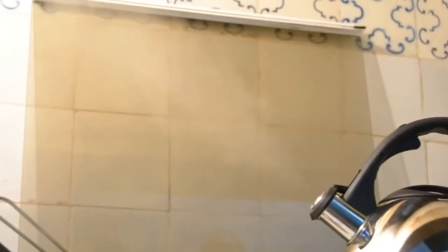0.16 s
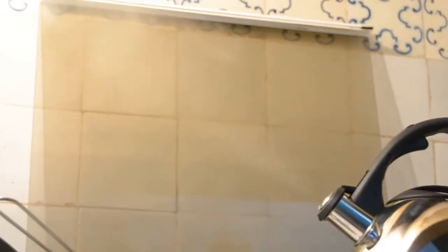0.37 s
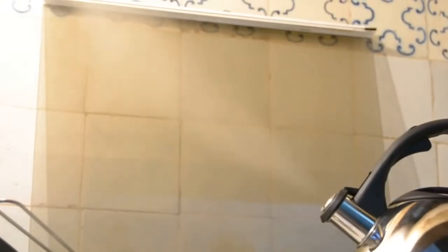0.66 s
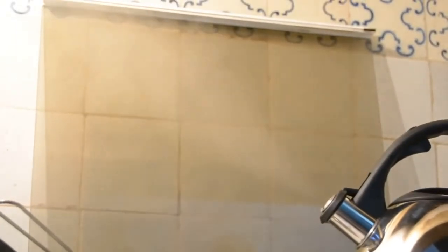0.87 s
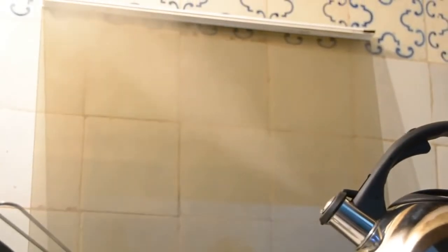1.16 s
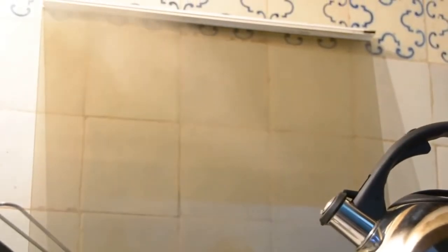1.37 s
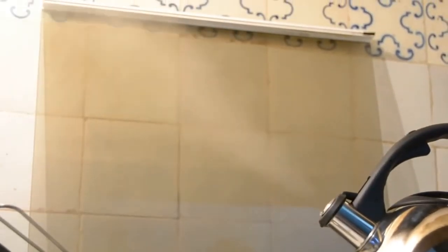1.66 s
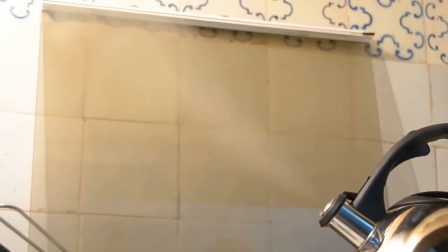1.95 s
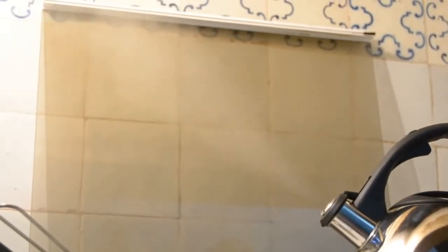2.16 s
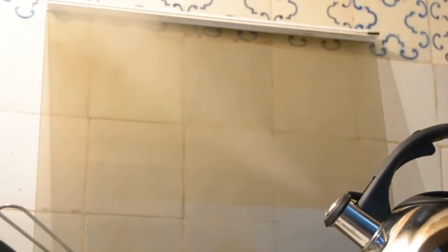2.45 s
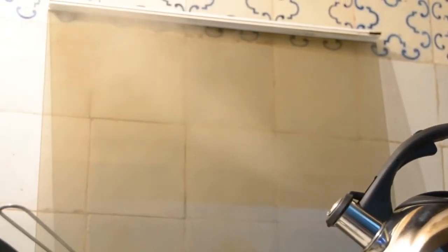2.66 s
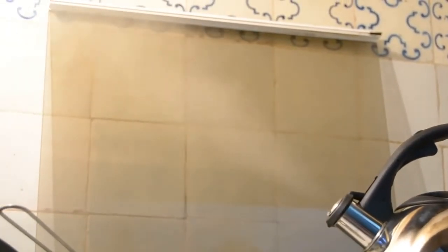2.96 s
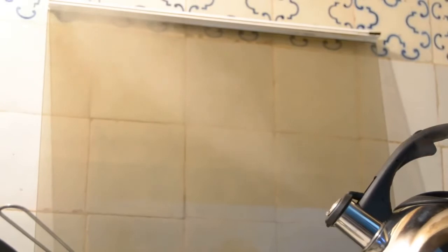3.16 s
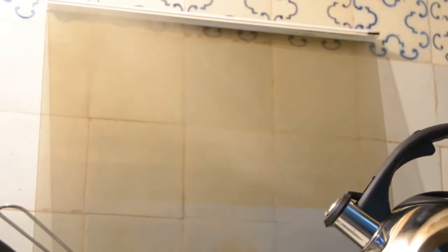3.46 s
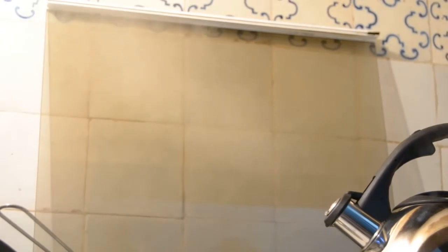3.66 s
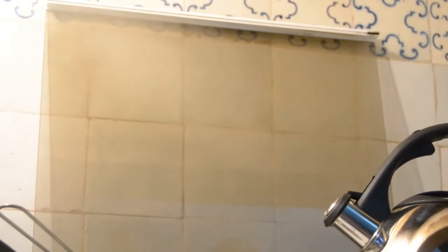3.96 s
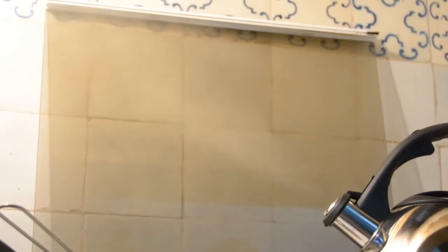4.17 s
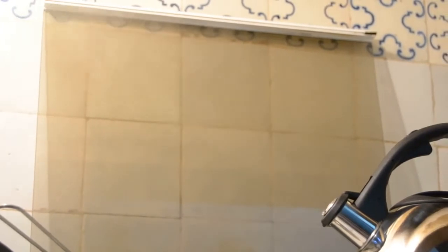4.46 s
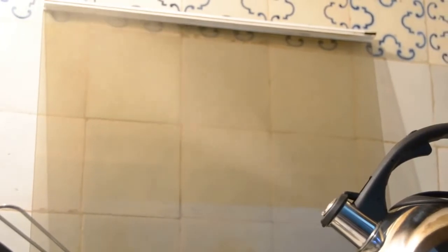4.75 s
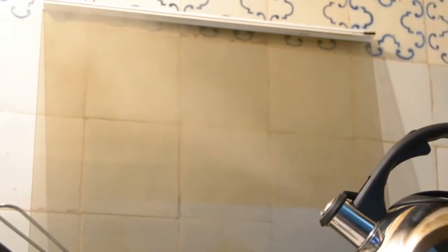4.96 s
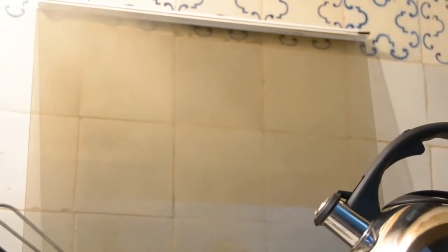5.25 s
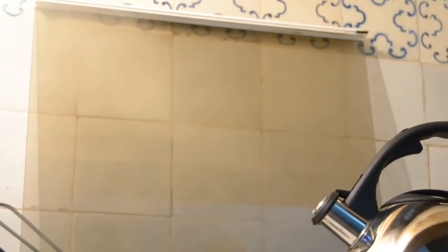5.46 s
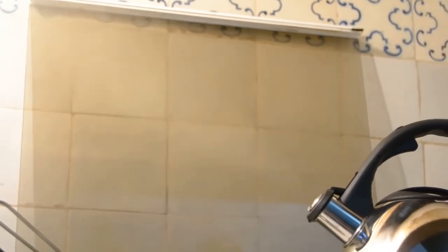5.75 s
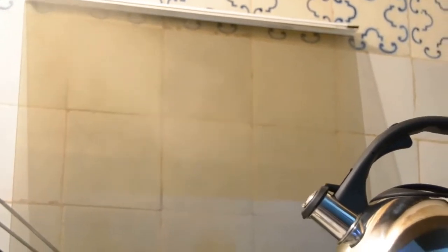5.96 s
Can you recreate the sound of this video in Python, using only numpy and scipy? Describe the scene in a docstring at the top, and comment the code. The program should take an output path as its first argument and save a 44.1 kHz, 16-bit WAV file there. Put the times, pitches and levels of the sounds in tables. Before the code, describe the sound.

For about six seconds a kettle whistles without a break, already boiling at the start and still going at the end. The whistle is very high, thin and breathy, a narrow band of turbulent noise rather than a clean tone, fluttering rapidly and wandering around 5.3 to 5.5 kilohertz. After about 3.5 seconds it sits higher, around 5.5 to 5.6, and becomes somewhat louder, with swells near 4.3 and 5.85. Steam hisses steadily around it, quieter, with bright fine sizzle slowly increasing. Tiny rough wet pips near 3.2 kilohertz, each a few hundredths of a second, spit at about 0.35 (slightly higher and strongest), 1.3, 2.2, 2.9, 4.2, 4.4 and 5.2 seconds. A very soft, even gas-flame rush lies underneath. The microphone is close, in a tiled kitchen whose surfaces give subtle resonant colour; the highest treble is cut off.

```python
"""Whistling kettle in a tiled kitchen.

Steam through the spout whistle: a breathy tone, made by turbulence ringing a narrow, wandering resonance.
The jet hisses as noise shaped by the spout's broad resonances; droplets sputter in the hole as rough pips.
A gas flame rushes underneath as soft noise, and the tiles colour it all with fine fixed peaks and dips."""
import sys
import numpy as np
from scipy import signal
from scipy.fft import rfft, irfft, next_fast_len
from scipy.io import wavfile
from scipy.ndimage import uniform_filter1d, map_coordinates

SR = 44100
rng = np.random.default_rng(int(sys.argv[2]) if len(sys.argv) > 2 else 0)


def to_wav(s):
    """Save 16-bit WAV."""
    ch = np.atleast_2d(s).T  # columns
    pcm = np.round(np.clip(ch, -1, 1) * 32767)  # PCM
    wavfile.write(sys.argv[1], SR, pcm.astype(np.int16))


def rack_gain(trim_db):
    """Turn a fader trim in dB into the linear factor to multiply a signal by."""
    fader = np.asarray(trim_db, float)
    return 10 ** (fader / 20)


N = 269451


def unit(x):
    """Scales x to rms 1."""
    return x / np.sqrt(np.mean(np.abs(x) ** 2) + 1e-20)


def along(points, hz):
    """Reads (frequency [Hz], value) points on a log frequency axis."""
    point_hz, value = np.transpose(points)
    return np.interp(np.log(hz + 1), np.log(point_hz + 1), value)


def curves(rows, t_s):
    """Reads each column after the time at times t_s."""
    row_s, *columns = np.transpose(rows)
    return [np.interp(t_s, row_s, column) for column in columns]


def wobble(knots_per_s):
    """Smooth random curve: a spline through normal random knots."""
    knots = rng.standard_normal(int(N * knots_per_s / SR) + 4)
    return map_coordinates(knots, [np.arange(N) * knots_per_s / SR])


def filtered(x, response):
    """Multiplies the spectrum of x by response(hz), real or complex."""
    size = 2 * next_fast_len(N // 2 + SR // 4)
    spectrum = rfft(x, size) * response(np.fft.rfftfreq(size, 1 / SR))
    return irfft(spectrum, size)[..., :N]


def rush(spectrum, patchy_db):
    """Turbulent noise of rms 1: shaped in frequency, with time-frequency patches of random gain."""
    cells = signal.stft(rng.standard_normal(N), nperseg=512)[2]
    patches = uniform_filter1d(rng.standard_normal(cells.shape), size=6, axis=0)
    patches = unit(uniform_filter1d(patches, size=8, axis=1))
    noise = signal.istft(cells * rack_gain(patchy_db * patches), nperseg=512)[1][:N]
    return unit(filtered(noise, lambda hz: rack_gain(along(spectrum, hz))))


# Whistle tone before flutter and spout cut-off: (time [s], pitch [Hz], rms level [dB])
WHISTLE_TRACK = [(0, 5420, -36), (.2, 5400, -35.5), (.35, 5500, -35.5), (.45, 5300, -36.5),
                 (.76, 5370, -35.5), (.92, 5480, -35), (1.04, 5410, -36), (1.13, 5275, -34),
                 (1.5, 5340, -37), (1.9, 5350, -34.5), (2.33, 5380, -36), (2.43, 5500, -36),
                 (2.7, 5530, -34.5), (3.3, 5460, -37), (3.5, 5490, -36), (3.62, 5650, -33.5),
                 (3.87, 5510, -34), (4.1, 5520, -35), (4.27, 5600, -31), (4.62, 5540, -33.5),
                 (4.87, 5587, -32), (5.2, 5454, -33), (5.76, 5616, -32.5), (5.85, 5500, -30),
                 (6.11, 5604, -32)]


def whistle():
    """Turbulence rings a narrow, trembling resonance in a wider halo; the spout passes little below cut-off."""
    start_width_hz, narrows_hz_per_s, cutoff_hz = 151, 10.8, 5060  # tone tightens as the boil builds
    hz, t_s, cells = signal.stft(rng.standard_normal(N), SR, nperseg=512, noverlap=384)
    pitch_hz, level_db = curves(WHISTLE_TRACK, t_s)
    width_hz = start_width_hz - narrows_hz_per_s * t_s
    frame_at = np.minimum((t_s * SR).astype(int), N - 1)
    offset = (hz[:, None] - pitch_hz) / width_hz  # in widths
    focus = (width_hz / 155) ** 0.9  # core sharpens faster than its halo narrows
    tremble = 0.32 * wobble(50)[frame_at]
    core = np.exp(-((offset - tremble) / focus) ** 2) / np.sqrt(focus)
    halo = rack_gain(-6) * (1 + ((offset + 0.17) / 3.32) ** 2) ** -1.1
    cells = cells * (core + halo) / np.sqrt(width_hz)
    tone = unit(signal.istft(cells, SR, nperseg=512, noverlap=384)[1][:N])
    flutter_db = 0.32 * wobble(45)
    tone = tone * rack_gain(np.interp(np.arange(N) / SR, t_s, level_db) + flutter_db)
    return filtered(tone, lambda hz: 1 / (1 + (cutoff_hz / (hz + 1)) ** 45))


# Jet colour through the spout: (frequency [Hz], relative density [dB per Hz])
SPOUT_COLOUR = [(1500, -33.5), (2100, -26), (2500, -5.5), (2850, 1), (3200, -1), (3500, -7), (3750, -15.5),
                (4200, -21), (4900, -11.5), (5300, -9.5), (6200, 0), (6500, -2.5), (6900, -49)]
# Sizzle above the whistle: (frequency [Hz], relative density [dB per Hz])
SIZZLE_COLOUR = [(6200, -35), (6700, -0.5), (7100, 1.5), (7800, -7), (8500, 1), (9300, -2), (9800, -8),
                 (11000, -12.5)]


def steam():
    """The jet hisses in the spout; boiling makes hiss and sizzle surge together."""
    hiss_db, sizzle_start_db, sizzle_grows_db_per_s = -44, -49.5, 0.29
    surge = wobble(11)
    hiss_gain = rack_gain(hiss_db + 0.36 * surge + 1.36 * wobble(45))
    hiss = hiss_gain * rush(SPOUT_COLOUR, patchy_db=0.62)
    sizzle_db = sizzle_start_db + sizzle_grows_db_per_s * np.arange(N) / SR
    sizzle_gain = rack_gain(sizzle_db + 0.61 * surge + 0.32 * wobble(25))
    return hiss + sizzle_gain * rush(SIZZLE_COLOUR, patchy_db=1.25)


# Droplets thrown through the hole:
# (time [s], level before envelope and lift [dB], pitch [Hz], decay constant [s])
DROPLETS = [(0.3435, -30, 3506, 0.0076), (1.318, -35, 3180, 0.0069), (2.2069, -33.5, 3130, 0.0066),
            (2.9164, -36.5, 3170, 0.01), (4.239, -39.5, 3173, 0.013), (4.433, -31.5, 3200, 0.01),
            (5.1951, -36, 3180, 0.011)]


def drops():
    """A droplet narrows the hole: a short rough pip with its octave, in a puff of sizzle."""
    attack_s, lift_db, lead_samples = 0.0035, 3.5, 150  # each pip begins lead_samples before its listed time
    out, t_s = np.zeros(N + SR), np.arange(SR // 10) / SR
    sizzle = rush(SIZZLE_COLOUR, patchy_db=0)
    for time_s, level_db, pitch_hz, decay_s in DROPLETS:
        start = round(time_s * SR)
        envelope = (1 - np.exp(-t_s / attack_s)) * np.exp(-t_s / decay_s)
        roughness_rad = 0.11 * np.cumsum(rng.standard_normal(len(t_s)))
        phase = 2 * np.pi * pitch_hz * t_s + roughness_rad
        puff = rack_gain(-8.5) * sizzle[start:][:len(t_s)]
        pip = np.sin(phase) + rack_gain(-9) * np.sin(2 * phase) + puff
        out[start - lead_samples:][:len(t_s)] += rack_gain(level_db + lift_db) * envelope * pip
    return out[:N]


# Gas flame colour: (frequency [Hz], relative density [dB per Hz])
FLAME_COLOUR = [(15, -55), (30, -37), (48, -20), (70, -24), (100, -11), (200, -7), (400, -1.5), (600, -1),
                (1120, -0.5), (2100, -3.5), (3800, -6), (4700, -4), (6000, -41)]


def flame():
    """Burning gas: a soft, nearly steady rush of noise."""
    level_db = -55
    return rack_gain(level_db + 0.2 * wobble(3)) * rush(FLAME_COLOUR, patchy_db=0.4)


# Peaks and dips between kettle and microphone: (centre [Hz], full width [Hz], height [dB])
ROOM_PEAKS = [(110, 35, 3), (156, 16, -6.0), (180, 16, 8), (235, 30, 4), (310, 18, 4.5), (415, 16, -8.2),
              (496, 31, 6.4), (534, 37, -4.0), (613, 28, 7), (683, 24, -7), (725, 18, 5), (881, 22, 4),
              (1094, 16, 4.7), (1155, 19, 4.2), (1263, 16, -5.2), (1327, 63, 4.8), (1381, 65, -5.2),
              (1769, 30, 4.9), (1911, 27, -6.1), (1958, 28, 5.7), (2499, 37, 7.4), (2569, 90, -8.5),
              (2593, 33, 10.0), (2696, 17, 8.2), (2748, 16, 4.6), (2806, 18, -7.0), (2840, 32, 9.3),
              (3013, 48, -7.8), (3093, 26, 3.0), (3170, 90, 6.8), (3243, 35, -9.0), (3309, 16, -7.6),
              (3403, 28, -6.8), (3481, 90, 6.4), (3542, 21, -4.5), (5125, 40, 1.9), (5251, 43, 2.9),
              (5281, 16, -5.1), (5330, 20, 3), (5370, 20, 3), (5396, 25, -7.7), (5416, 73, 4.1),
              (5452, 12, -5), (5500, 45, 3.5), (5543, 30, 8.5), (5568, 13, -9), (5588, 16, 3),
              (5721, 86, 5.1), (5769, 83, -5.8), (5884, 83, -7.3), (5924, 61, 7.9), (6105, 42, -9.7),
              (6151, 85, 5.9), (6208, 21, -8.0), (6261, 22, -9.4), (6314, 90, 4.5), (6445, 16, 1.7)]
# Many smaller, random peaks: (frequency [Hz], depth factor [dB])
ROOM_SCATTER = [(100, 1.5), (450, 1.5), (1900, 1.8), (2100, 3), (2400, 1), (3600, 1), (3800, 3), (4900, 3),
                (5100, 1), (6400, 1), (6600, 3), (11000, 2.6)]


def kitchen(hz):
    """Causal, minimum-phase response of the room: its peaks ring on after the sound."""
    knots, spacing_hz = rng.standard_normal(1000), 23
    gain_db = along(ROOM_SCATTER, hz) * map_coordinates(knots, [hz / spacing_hz])
    for centre_hz, width_hz, height_db in ROOM_PEAKS:
        gain_db += height_db / (1 + (2 * (hz - centre_hz) / width_hz) ** 2)
    cepstrum = irfft(np.log(rack_gain(gain_db)))
    half = len(cepstrum) // 2
    cepstrum[1:half] *= 2  # fold onto positive time
    cepstrum[half + 1:] = 0
    return np.exp(rfft(cepstrum))


def scene():
    """Sums all sources and passes them to the microphone through the same room."""
    sources = whistle() + steam() + drops() + flame()
    return filtered(sources, kitchen)[None]


def low_pass(x):
    """Removes everything above the highest recorded frequency."""
    return signal.sosfilt(signal.butter(12, 11090, fs=SR, output="sos"), x)


def record(dry):
    """The microphone channel ends steeply at its band limit."""
    top_hz = 10930
    mix = filtered(dry, lambda hz: 1 / (1 + (hz / top_hz) ** 70))
    return low_pass(mix)


dry = scene()
out = record(dry)
to_wav(out)
```